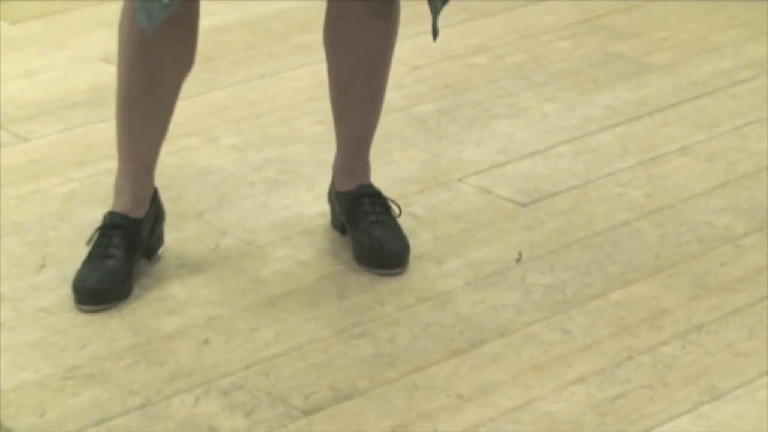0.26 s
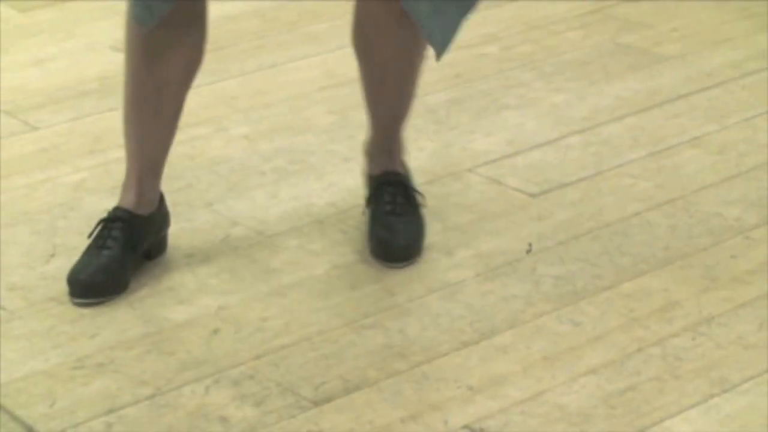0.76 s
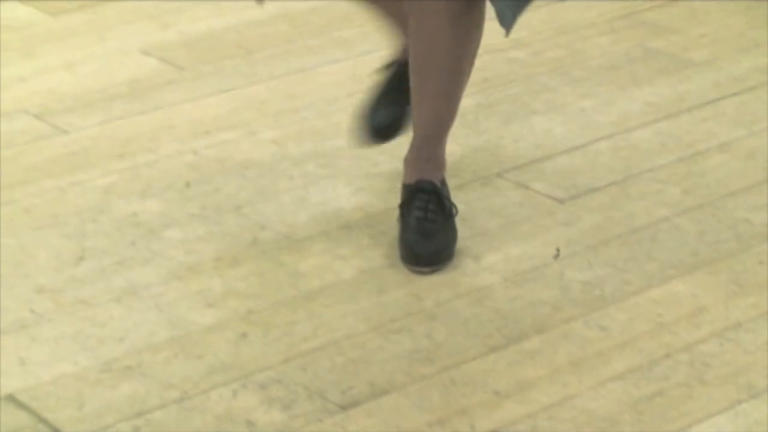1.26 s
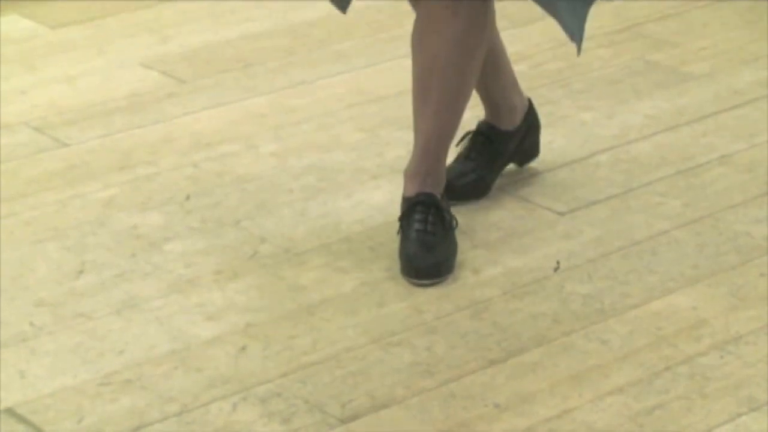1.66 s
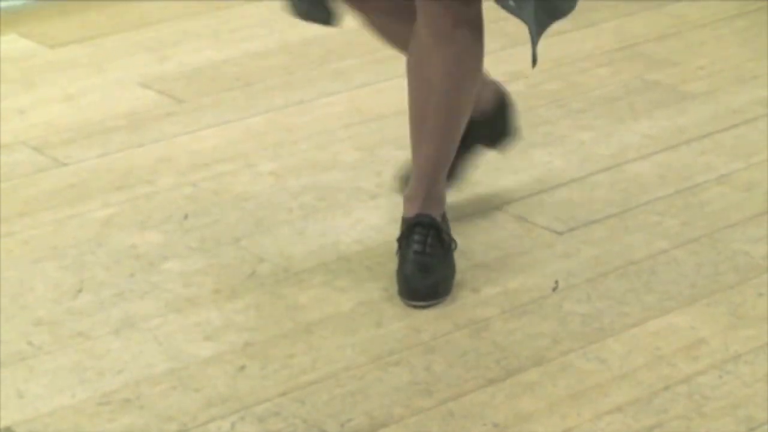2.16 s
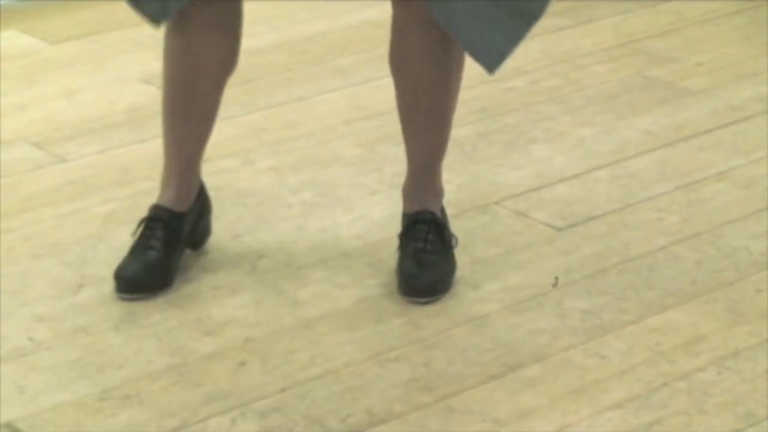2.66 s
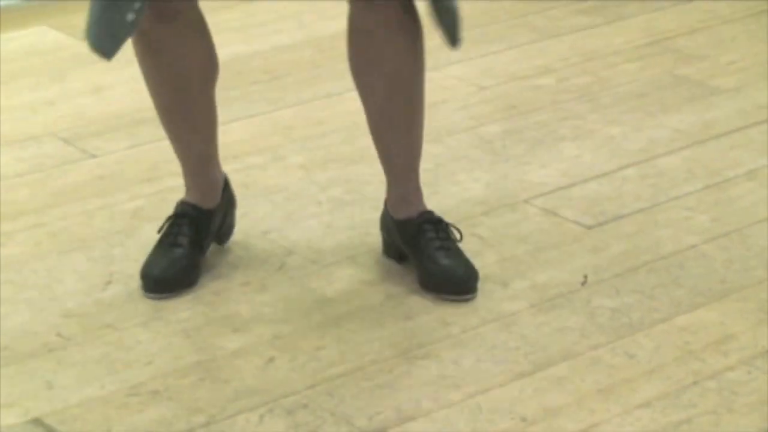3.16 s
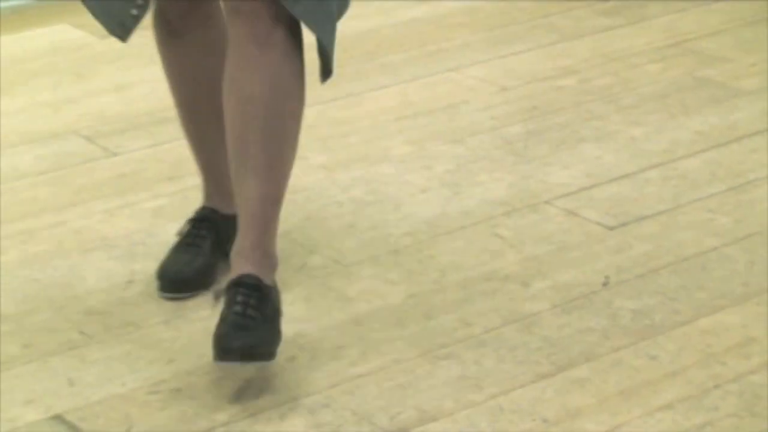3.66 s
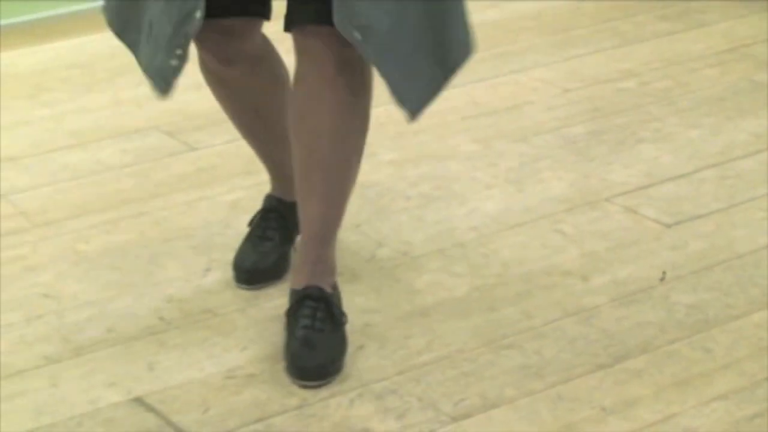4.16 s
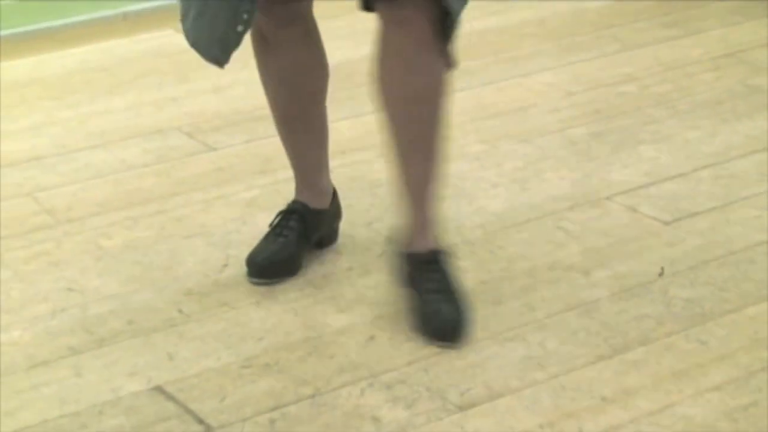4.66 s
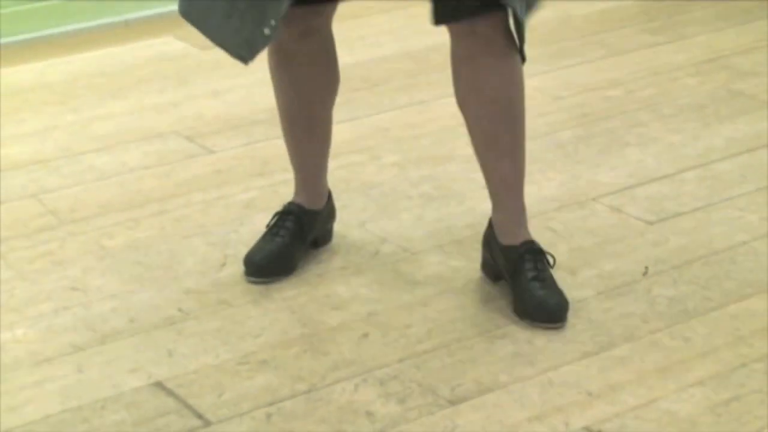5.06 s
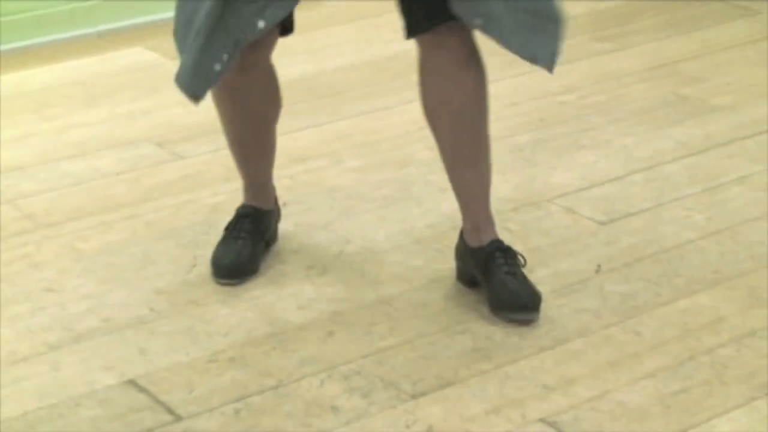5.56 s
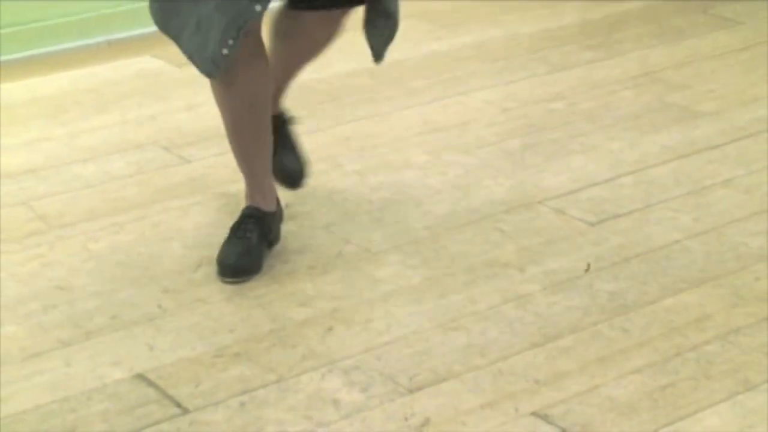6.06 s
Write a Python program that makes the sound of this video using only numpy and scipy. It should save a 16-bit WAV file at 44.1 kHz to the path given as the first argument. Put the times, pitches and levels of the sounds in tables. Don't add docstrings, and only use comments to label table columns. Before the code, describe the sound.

One pair of metal-plated tap shoes strikes a sprung wooden floor evenly, roughly every 0.3 seconds. Mostly two loud, bright clacks are followed by two much softer taps. Each short knock spreads into nearly a second of reverberation in a large bare studio. Low ventilation rumbles underneath. The microphone pair stands across the room, its loudest peaks flattened, and takes a dull housing bump just after one second.

```python
import sys
import numpy as np
from scipy import signal
from scipy.fft import rfft, irfft
from scipy.io import wavfile
from scipy.ndimage import uniform_filter1d, minimum_filter1d

SR = 44100
rng = np.random.default_rng(int(sys.argv[2]) if len(sys.argv) > 2 else 0)


def gain_from_db(level_db):
    decades = np.asarray(level_db, float) / 20
    return 10 ** decades


def dump_mix(stems):
    frames = np.atleast_2d(stems).T
    limited = np.clip(frames, -1, 1)
    pcm = np.round(limited * 32767).astype(np.int16)
    wavfile.write(sys.argv[1], SR, pcm)


N = 278271

# pitch_hz, density_db [dB per Hz]
AIR_SPECTRUM = [(15, -33), (27, -9), (43, -8), (58, 6.5), (73, -13), (110, -8.5), (440, -24), (1300, -23),
                (2200, -44), (15000, -47)]
# start_s, peak_db
HOUSING_KNOCKS = [
    (1.1498, -5.5),
    (1.256, -45),
]
# pitch_hz, t60_s
HALL_DECAY = [(45, 1), (125, 0.82), (250, 0.86), (500, 0.85), (1000, 0.74), (2000, 0.72), (4000, 0.71),
              (8000, 0.62), (13000, 0.37)]
# delay_s, level_db
ECHOES = [(.0033, -3.5), (.0077, -18), (0.0145, -11.5), (0.0165, -17.5), (0.025, -9.5), (0.032, -15.5)]
# pitch_hz, width_hz, level_db
JOISTS = [(30, 20, 8.5), (56.5, 12.4, 0.5), (75.7, 34, -14.5)]
BOARDS = [(128, 62, -13.5), (211, 176, -10.5), (288, 132, 6.5), (442, 104, 0), (508, 360, 7), (712, 65, -8)]
SOLE = [(1030, 220, 2.5), (1375, 170, 1.5), (1635, 320, 4)]
KNOCK = [(2000, 820, 11), (2358, 210, 3), (2820, 500, 10)]
DAMPED_PLATE = [(3720, 1500, 9), (5100, 2400, -47), (5800, 1200, 6.5), (6990, 260, -1), (8260, 410, -7),
                (8980, 730, 5.5), (10650, 3000, 9.5), (13430, 160, 3), (12400, 430, 7)]
# start_s, boards_db, knock_db, ring_db, lowest_free_mode_hz
TAPS = [(0.0363, -11, -5, -17, 4520), (0.3562, -10, -7.5, -16, 4430), (0.6579, -31.5, -31.5, -27.5, 4600),
        (0.9552, -21, -19.5, -22.5, 3300), (1.273, -14, -6.5, -14.5, 6000), (1.5806, -14, -12.5, -18, 4610),
        (1.8797, -31, -30.5, -29.5, 5500), (2.1692, -21, -17, -30.5, 5090),
        (2.4675, -12.5, -9, -16.5, 3700), (2.7743, -9, -4.5, -14.5, 5600),
        (3.0552, -33.5, -25.5, -27.5, 3520), (3.3619, -25.5, -24.5, -31, 4900),
        (3.6515, -11.5, -9.5, -16, 3480), (3.9632, -7.5, -9.5, -14, 3550),
        (4.2522, -26, -27.5, -25.5, 3780), (4.5508, -31.5, -34, -37, 5100), (4.8515, -9, -7, -18, 3460),
        (5.1637, -7, -10, -14.5, 3654), (5.4448, -27.5, -27.5, -34.5, 5300),
        (5.7203, -29, -27.5, -32.5, 4800), (6.0236, -17.5, -16.5, -20, 4700)]
# joist_thump_db, sole_db (at a blow of -20 dB),
# sole_follows (share of the blow's strength, 0-1), knock_hz
STEPS = [
    (-31, -28, 1, 2230),
    (-34, -15.5, 0.11, 2420),
    (-32, -19.5, 0.81, 2230),
    (-25, -18.5, 0.41, 2570),
]
# lowest_db, second_hz, second_db, third_hz, third_db
FREE_PLATE = [
    (-5.5, 6350, -7.5, 10200, -9.5),
    (-4.5, 6660, -8, 10550, -7.5),
    (-7.5, 7160, -14, 10300, -10.5),
    (-10, 7540, -7, 10450, -2.5),
]
# start_s, end_s
OTHER_SHOE_S = (2.9, 5.6)
# first_shoe_db, other_shoe_db
SHOE_RING_DB = (-3, 3)
# toe_hz, heel_hz, lift_hz, brush_hz
SOLE_HZ = [(1540, 1290, 860, 1100), (1140, 1050, 1270, 1200)]


def air():
    hz = np.fft.rfftfreq(N, 1 / SR)
    pitch_hz, density_db = np.array(AIR_SPECTRUM).T
    colour = gain_from_db(np.interp(np.log(hz + 1), np.log(pitch_hz), density_db))
    noise = irfft(rfft(rng.standard_normal((2, N))) * colour, N)
    return gain_from_db(-39) * noise / noise.std()


def earlier_tail():
    band = signal.butter(1, [210, 2900], "band", fs=SR, output="sos")
    noise = signal.sosfilt(band, rng.standard_normal((2, N)))
    return gain_from_db(-33.5 - 65 * np.arange(N) / SR) * noise


def housing_knocks():
    t = np.arange(2000) / SR
    suck = -1.4 * (t < .0008)
    swing = .4 * np.exp(-t / .008) * np.cos(2 * np.pi * 52 * t)
    rebound = .5 * (t > .0027) * np.exp(-t / .003)
    out = np.zeros(N + 2000)
    for start_s, peak_db in HOUSING_KNOCKS:
        out[round(start_s * SR):][:len(t)] += gain_from_db(peak_db) * (suck + swing + rebound)
    return signal.lfilter(*signal.butter(2, 4500, fs=SR), out[:N])


def hall_bands(size):
    octave = np.log2(np.maximum(np.fft.rfftfreq(size, 1 / SR), 1))
    centres = np.log2(np.array(HALL_DECAY)[:, 0])
    white = rfft(rng.standard_normal((2, size)))
    return np.array([irfft(white * np.interp(octave, centres, one), size) for one in np.eye(len(centres))])


def hall(bands, start, size, build_s, direct_db, stray_db):
    t = np.arange(size) / SR
    dying = gain_from_db(-60 * t / np.array(HALL_DECAY)[:, 1:])
    dying = dying * (1 - np.exp(-t / build_s)) * np.sqrt(1 - t / t[-1])
    clumps = np.interp(t, np.arange(300) * .004, rng.standard_normal(300))
    clumps = gain_from_db(6.7 * clumps * np.exp(-t / 0.055))
    answer = np.einsum("bci,bi->ci", bands[:, :, start:start + size], dying) * clumps
    answer[1] *= gain_from_db(stray_db)
    early = np.zeros(size)
    early[0] = gain_from_db(direct_db)
    for delay_s, level_db in ECHOES:
        at = int(delay_s * (1 + .06 * rng.standard_normal()) * SR)
        early[at] += gain_from_db(direct_db + level_db) * rng.choice([-1, 1])
    answer[0] += signal.lfilter(*signal.butter(2, 4200, fs=SR), early)
    return answer


def resonances(modes, hz):
    out = 0
    for mode_hz, width_hz, level_db in modes:
        detuning = (mode_hz ** 2 - hz ** 2) ** 2
        out = out + gain_from_db(level_db) ** 2 * width_hz * hz ** 2 / (detuning + (width_hz * hz) ** 2)
    return out / np.mean(out)


def causal(power):
    cepstrum = irfft(np.log(power + 1e-12) / 2)
    half = len(cepstrum) // 2
    cepstrum[1:half] *= 2
    cepstrum[half + 1:] = 0
    return np.exp(rfft(cepstrum))


def blow(tap, step, hz):
    start_s, boards_db, knock_db, ring_db, lowest_hz = tap
    thump_db, sole_db, follows, knock_hz = STEPS[step]
    sole_db = sole_db + follows * ((boards_db + knock_db) / 2 + 19.5)
    boards_grid, plate_grid = hz * (1 + 0.027 * rng.standard_normal(2))[:, None]
    shoe = int(OTHER_SHOE_S[0] < start_s < OTHER_SHOE_S[1])
    struck = np.array(DAMPED_PLATE) + [0, 0, 2.2] * rng.standard_normal((len(DAMPED_PLATE), 1))
    struck[0, 2] += SHOE_RING_DB[shoe]

    wood = gain_from_db(thump_db) ** 2 * resonances(JOISTS, hz)
    wood = wood + gain_from_db(boards_db) ** 2 * resonances(BOARDS, boards_grid)
    own_sole = resonances([(SOLE_HZ[shoe][step], 240, 0)], hz)
    sole = gain_from_db(sole_db) ** 2 * (0.41 * resonances(SOLE, hz) + 0.36 * own_sole)
    own_knock = resonances([(knock_hz, 380, 0)], hz)
    knock = gain_from_db(knock_db) ** 2 * (0.68 * resonances(KNOCK, hz) + 0.23 * own_knock)
    knock = 0.97 * knock / (1 + (hz / 3300) ** 8)
    metal = gain_from_db(ring_db) ** 2 * resonances(struck, plate_grid)
    for mode_hz, mode_db in np.reshape([lowest_hz, *FREE_PLATE[step]], (-1, 2)):
        free_mode = resonances([(mode_hz, 0.1 * mode_hz, 0)], hz)
        metal = metal + gain_from_db(ring_db + mode_db + 4) ** 2 * free_mode
    return -gain_from_db(-0.5) * causal(wood + knock + sole + metal)


def taps():
    size, padded = 3 * 2 ** 14, 2 ** 16
    out = np.zeros((2, N + padded))
    bands = hall_bands(4 * size)
    hz = np.fft.rfftfreq(padded, 1 / SR)
    for k, tap in enumerate(TAPS):
        direct_db = 30 - 0.4 * (tap[2] + 20)
        answer = hall(bands, rng.integers(3 * size), size, build_s=0.021, direct_db=direct_db, stray_db=-4)
        at = round(tap[0] * SR)
        out[:, at:at + padded] += irfft(rfft(answer, padded) * blow(tap, k % len(STEPS), hz), padded)
    return out[:, :N]


def scene():
    common, stray = air() + earlier_tail() + taps()
    common = common + housing_knocks()
    return np.array([common + stray, common - stray])


def duck(x):
    rise_db, ahead_s, above_hz = 28, .016, 1600
    level = 10 * np.log10(uniform_filter1d(np.gradient(x[0]) ** 2, size=160) + 1e-12)
    coming = -minimum_filter1d(-level, size=round(ahead_s * SR), origin=-round(ahead_s * SR / 2) + 1)
    before = uniform_filter1d(level, size=900, origin=449)
    mute = (coming - before > rise_db) & (coming - level > rise_db - 8)
    bass = signal.sosfiltfilt(signal.butter(4, above_hz, fs=SR, output="sos"), x * mute)
    return x + uniform_filter1d(1. * mute, size=60) * (bass - x)


def top_cut(x):
    return signal.sosfilt(signal.butter(12, 16470, fs=SR, output="sos"), x)


def record(dry):
    hz = np.fft.rfftfreq(N, 1 / SR)
    common, stray = rfft(dry[0] + dry[1]) / 2, rfft(dry[0] - dry[1]) / 2
    stray = stray * hz ** 2 / (hz ** 2 + 5500 ** 2)
    ports = irfft([common + stray, common - stray], N)
    ceiling = .41
    left, right = rfft(ports / (1 + np.abs(ports / ceiling) ** 8) ** (1 / 8))
    half_turn = np.pi / 2 * (hz / 15300) ** 2
    left, right = left * np.exp(-1j * half_turn), right * np.exp(1j * half_turn)
    presence = 1 + 0.028 * hz ** 2 / (hz ** 2 + 3000 ** 2)
    presence = presence / (1 + (hz / 14700) ** 49.0)
    side_band = hz ** 2 / (hz ** 2 + 900 ** 2) / (1 + (hz / 15000) ** 12)
    mid = (left + right) / 2 * presence
    side = (left - right) / 2 * presence * side_band
    mid, side = duck(irfft([mid, side], N))
    return top_cut(np.array([mid + side, mid - side]))


dry = scene()
out = record(dry)
dump_mix(out)
```